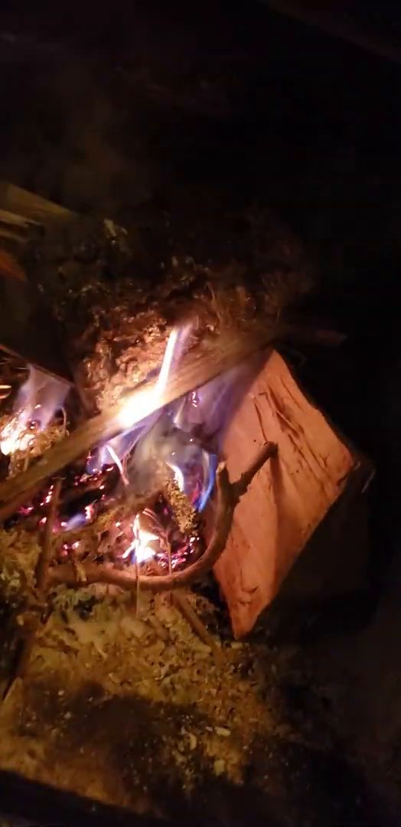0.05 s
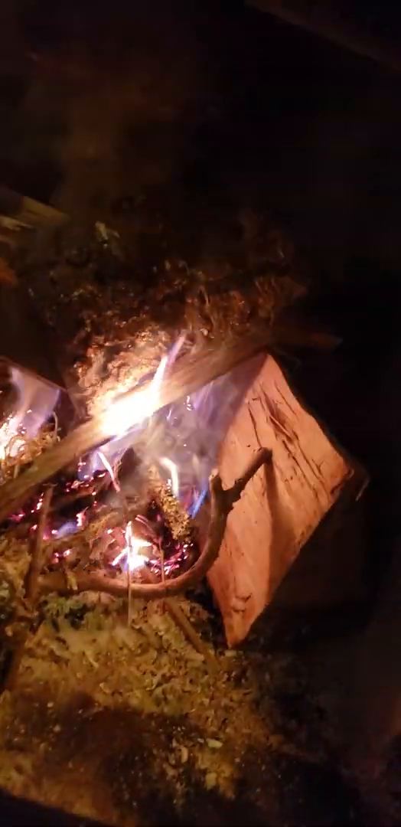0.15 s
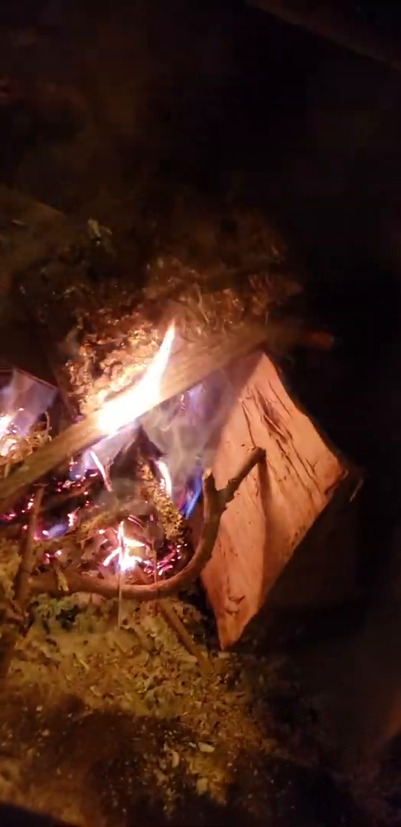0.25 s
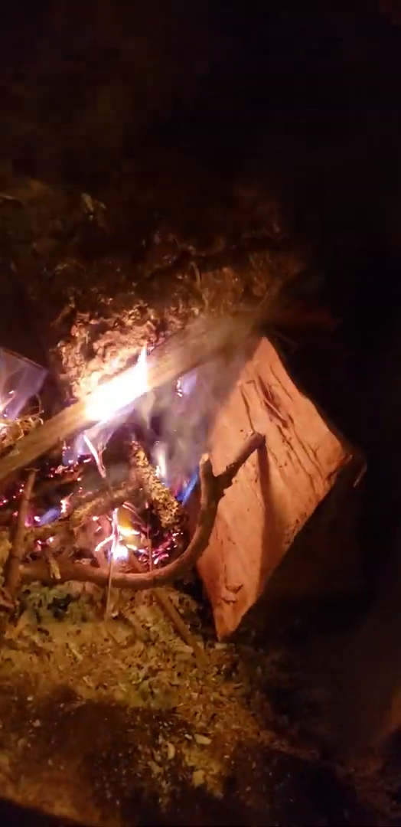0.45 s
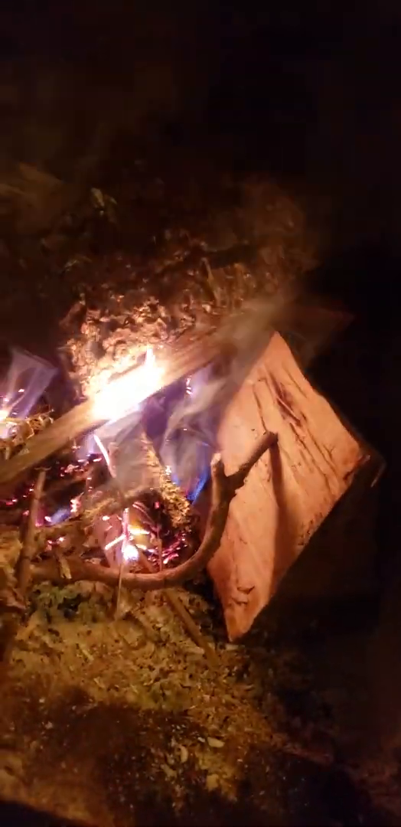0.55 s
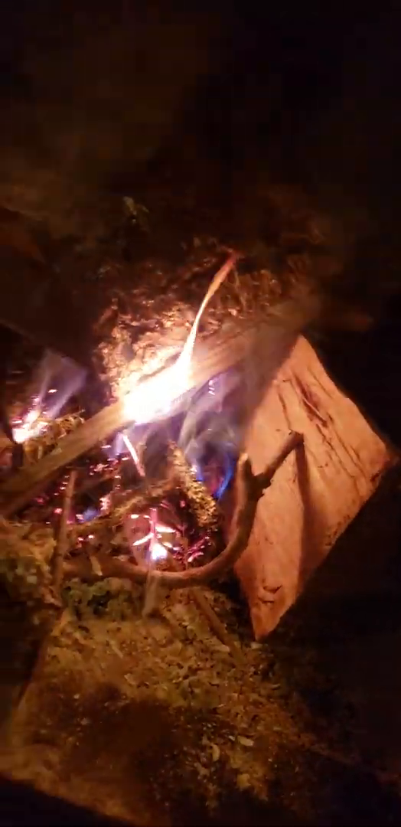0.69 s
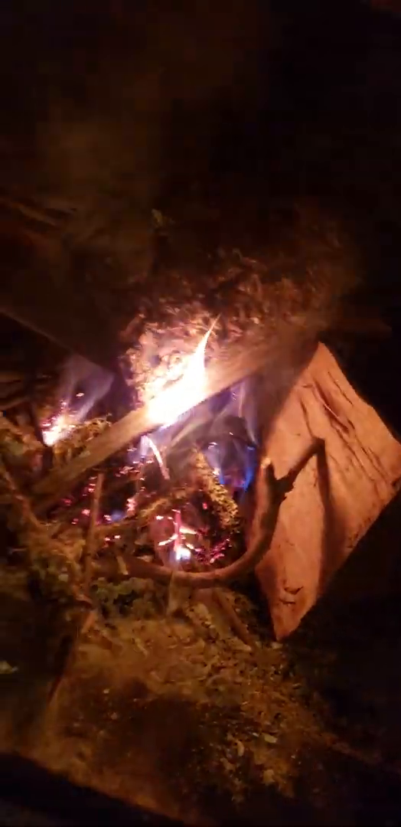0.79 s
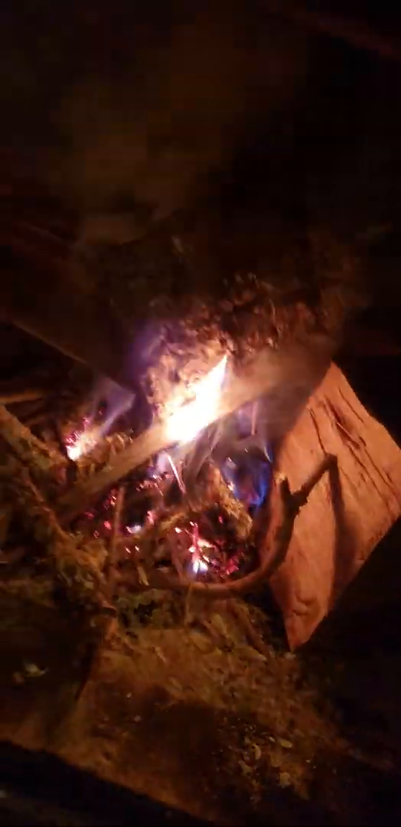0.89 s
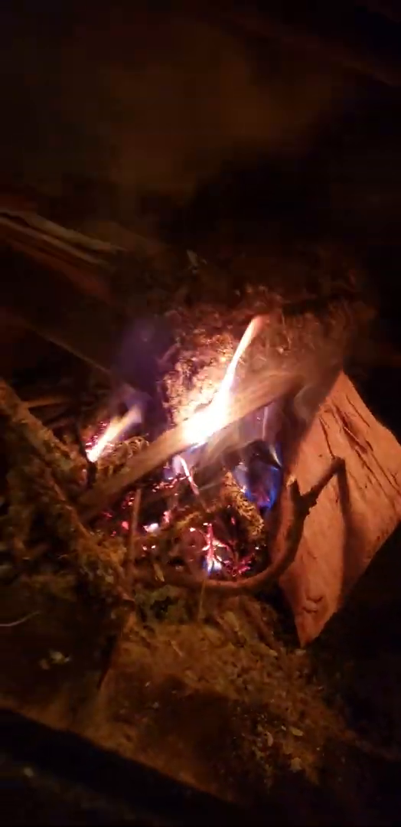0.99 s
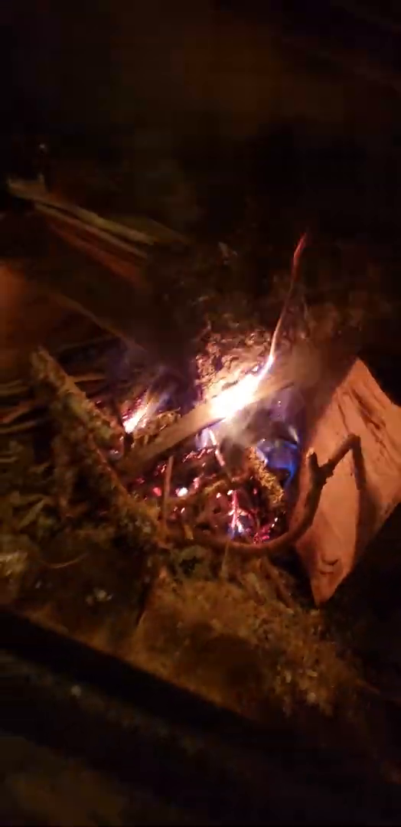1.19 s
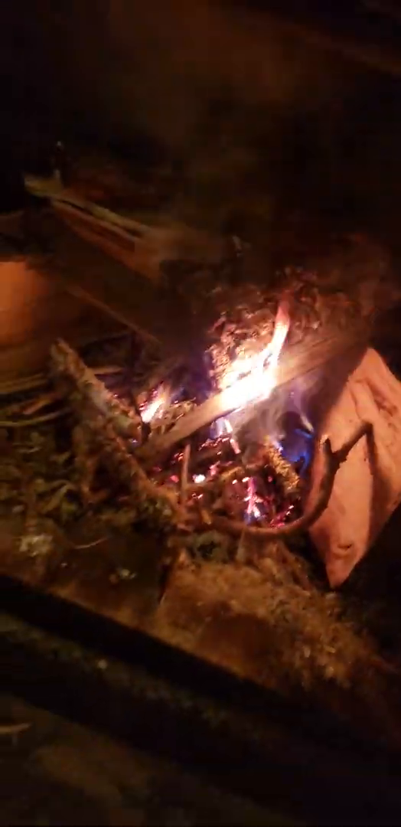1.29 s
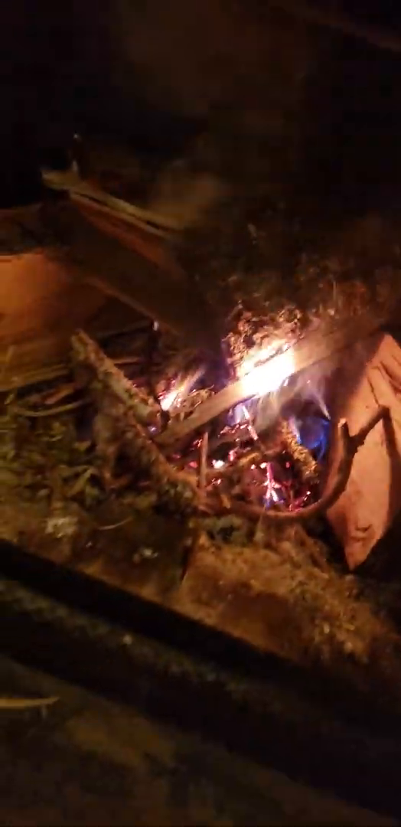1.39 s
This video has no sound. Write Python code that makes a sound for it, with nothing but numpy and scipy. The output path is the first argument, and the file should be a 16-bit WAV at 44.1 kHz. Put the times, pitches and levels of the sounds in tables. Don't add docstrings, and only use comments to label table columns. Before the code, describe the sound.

Small wood fire crackling close up, with sharp irregular snaps, fine sizzle and soft hollow knocks

```python
import sys
import numpy as np
from scipy import signal
from scipy.fft import rfft, irfft
from scipy.io import wavfile
from scipy.ndimage import uniform_filter1d

SR = 44100
rng = np.random.default_rng(int(sys.argv[2]) if len(sys.argv) > 2 else 0)


def elevation(decibels):
    levels = np.asarray(decibels, float)
    return 10 ** (levels / 20)


def store_pcm(level_fs):
    pcm = np.round(np.clip(level_fs, -1, 1) * 32767).astype(np.int16)
    wavfile.write(sys.argv[1], SR, np.atleast_2d(pcm).T)


N = 63945

# (frequency [Hz], level [dB], decay time T60 [s])
BOX_MODES = [(66, -46, 0.48), (107.6, 3.5, 0.2), (150, -5.5, 0.18), (193.3, -0.5, 0.13), (250, -22, 0.13),
             (278, -15, 0.24), (322.1, 0, 0.13), (365.5, -0.5, 0.029), (456, -4, 0.036),
             (584.3, -7.5, 0.072), (699, -4, 0.031), (822, -13.5, 0.1), (1197, -5.5, 0.087)]
TICK_DEEP_DB = -3.5


def rms_one(x):
    return x / np.sqrt(np.mean(x ** 2) + 1e-20)


def at_hz(points, hz):
    point_hz, values = np.transpose(points)
    return np.interp(np.log(hz), np.log(point_hz), values)


def drift(rate_hz):
    hop, settle = 40, 2000
    pole = np.exp(-2 * np.pi * rate_hz * hop / SR)
    white = rng.standard_normal(N // hop + settle + 2)
    slow = signal.lfilter([1], [1, -2 * pole, pole ** 2], white)[settle:]
    return np.interp(np.arange(N) / hop, np.arange(len(slow)), rms_one(slow))


def ring(x, hz, t60):
    decay = elevation(-60 / (t60 * SR))
    angle = 2 * np.pi * hz / SR
    return signal.lfilter([0, np.sin(angle)], [1, -2 * decay * np.cos(angle), decay ** 2], x + 1e-18)


def colour(x, peaks):
    out = 0
    for k, (hz, width_hz, db) in enumerate(peaks):
        t60 = np.log(1000) / np.pi / width_hz
        out = out + (-1) ** k * elevation(db) * ring(x, hz, t60)
    return out


def dip(x, dips):
    for hz, width_hz, depth in dips:
        band = signal.lfilter(*signal.iirpeak(hz, hz / width_hz, fs=SR), x)
        x = x - np.clip(depth, 0, 1) * band
    return x


def lag(x, delay_s):
    cycles = delay_s * SR * np.arange(N // 2 + 1) / N
    return irfft(rfft(x) * np.exp(-2j * np.pi * cycles), N)


def banded_noise(spectrum, patchy_db, likeness_scale):
    # (frequency [Hz], correlation [0-1])
    port_likeness = [(60, 1), (250, 0.74), (600, 0.46), (2000, 0.42), (15000, 0.73)]
    out, together = 0, drift(1.9)
    lowest, highest = spectrum[0][0], spectrum[-1][0]
    octaves = np.log2(min(highest, 19000) / lowest)
    edges = np.append(lowest * 2 ** np.arange(0, octaves, 1 / 3), highest)
    white = rng.standard_normal((2, 2, N + 8000))
    for k, band in enumerate(zip(edges, edges[1:])):
        sos = signal.butter(2, band, "band", fs=SR, output="sos")
        mid, side = signal.sosfilt(sos, white[k % 2])[:, -N:]
        hz = np.sqrt(band[0] * band[1])
        alike = np.clip(likeness_scale * at_hz(port_likeness, hz), -.99, .99)
        gain = elevation(at_hz(spectrum, hz) + patchy_db * (0.2 * together + drift(10.1)))
        out = out + gain * (np.sqrt(1 + alike) * mid + np.sqrt(1 - alike) * side * [[1], [-1]])
    return rms_one(out)


def snaps():
    # (time [s], peak [dB], deep re bright [dB], body re bright [dB], tear length [ms])
    loud_snaps = [(.0284, -28, -11.5, -5.5, 1.75), (.0917, -32, -3.5, 1, .7), (.1549, -23, -14, -11.5, .25),
                  (.2967, -35, 2, -2, 1.38), (.3093, -39, -16, -2.5, 0.56), (.3776, -19, -15.5, -12, 0.46),
                  (.4971, -33.5, -32, -9.5, 0.87), (.5137, -32.5, -15, -8.5, 3.6),
                  (.7436, -23, -26, -10, 6), (.8348, -26, -3.5, -0.5, 1.1), (.9362, -11.5, -8, 1.5, 3.2),
                  (1.035, -30, -46, -10, 1.6), (1.1426, -39.5, -19, -4, 0.95), (1.207, -41, -11.5, -1, 1.3),
                  (1.2667, -31.5, -37, -1.5, 2.75), (1.439, -25, -27, -7.5, 1.2)]
    snap_sides = [2, -3.5, 10.5, 3.5, -11, 8, 2, -4, 2, 0.5, 2, 0, -14, -1.5, -9.5, 1]
    # (time [s], peak [dB], body re bright [dB])
    early_ticks = [(0.0002, -34, -1.5), (0.0588, -37.5, -1.5), (0.0664, -54, -16), (0.1012, -46, 4),
                   (0.1449, -38, -22), (0.1975, -36, -6.5), (0.2005, -47, -10), (0.2174, -38.5, -7),
                   (0.2363, -36, -19), (0.2428, -39, -28), (0.2513, -45, -24), (0.2838, -67, -13),
                   (0.2888, -48, -11), (0.3258, -38, 1), (0.3391, -48, 3), (0.391, -50.5, 10.5),
                   (0.41, -34, -9), (0.4283, -40, -2.5), (0.4328, -37, -9), (0.4823, -39, -26),
                   (0.507, -37, -21), (0.5395, -39, -9), (0.547, -42, 6)]
    # (time [s], peak [dB], body re bright [dB])
    late_ticks = [(0.5612, -33.5, -9), (0.574, -54, 8), (0.7991, -51, -7), (0.9576, -41, 1.5),
                  (0.9712, -35, -12), (1.0469, -45, -5), (1.0567, -36.5, -7.5), (1.1767, -45, -6.5),
                  (1.1885, -36.5, -34), (1.2291, -41, -21), (1.2491, -50, -8), (1.3094, -49, -28)]
    tick_ms, first_crack_db = 2, 3.5
    crack_spread_db, part_spread_db = 7, 3
    swell = 0.083
    deep_fade_db = 11

    rows = list(loud_snaps)
    for s, db, body_db in list(early_ticks) + list(late_ticks):
        rows.append((s, db, body_db + TICK_DEEP_DB, body_db, tick_ms))
    sides = np.append(snap_sides, np.zeros(len(rows) - len(loud_snaps)))
    chance = rng.uniform(-1, 1, (len(rows), 6, 12))
    trains = np.zeros((3, 2, N + SR))
    for (s, db, deep_db, body_db, ms), side_db, draws in zip(rows, sides, chance):
        signs, sizes, when, *mix = draws
        part = np.sort(np.abs(when)) - np.abs(when).min()
        at = ((s + 0.00053 + ms / 1000 * part) * SR).astype(int)
        crack_db = db - 10.5 - 6.35 * part + crack_spread_db * sizes + first_crack_db * (part == 0)
        cracks = elevation(crack_db) * np.sign(signs) * np.clip(0.39 + part / swell, 0, 1)
        part_db = np.array([[0], [body_db], [deep_db]]) - deep_fade_db * part * [[0], [.3], [1]]
        cracks = cracks * elevation(part_db + part_spread_db * np.array(mix))
        panned = cracks[:, None] * elevation([[side_db / 2], [-side_db / 2]])
        np.add.at(trains, (slice(None), slice(None), at), panned)
    return trains[..., :N]


def sizzle():
    rate_per_s, base_db, spread_db, body_db = 300, -74, 4.5, 1.5
    born = rng.random(N) < rate_per_s * elevation(3 * drift(8)) / SR
    size_db = base_db + spread_db * np.minimum(rng.exponential(1, N), 3)
    cracks = elevation(size_db) * rng.choice([-1, 1], N) * born
    return cracks * elevation([[[0]], [[body_db]], [[body_db + TICK_DEEP_DB]]])


def ports(bright, body, deep):
    # (frequency [Hz], width [Hz], level [dB])
    left_bright = [(14940, 1300, 2), (12600, 3600, 0.5)]
    right_bright = [(13150, 2500, 6.5), (16000, 2100, 6), (10650, 2000, -6)]
    left_body = [(7420, 910, 4.5), (5350, 4100, 5.5), (3810, 740, -4)]
    right_body = [(7400, 3700, -26), (4976, 630, 0)]
    left_deep = [(2270, 4200, -3), (1170, 2800, -5)]
    right_deep = [(2260, 780, 1.5), (1420, 2300, -12.5)]
    # (frequency [Hz], width [Hz], depth [0-1])
    right_shadow = [(3630, 1000, 0.04), (10100, 1700, 0.5), (6020, 660, 0.77)]
    bright_lag_s, right_lag_s = 0.0001136, .0001
    pan_db = 1

    left = colour(bright[0], left_bright) + colour(body[0], left_body) + colour(deep[0], left_deep)
    right = lag(colour(bright[1], right_bright), bright_lag_s)
    right = right + lag(colour(body[1], right_body) + colour(deep[1], right_deep), right_lag_s)
    heard = np.array([left, dip(right, right_shadow)])

    t = np.arange(SR // 4) / SR
    walls = elevation(-7 - 60 * t / 0.014)
    room = elevation(-37 - 60 * t / .14)
    tail = (walls + room) * rng.standard_normal((2, len(t))) * (t > .0008) / 4
    tail[:, 0] = 1
    return signal.fftconvolve(heard, tail, axes=1)[:, :N] * elevation([[pan_db / 2], [-pan_db / 2]])


def box(pushes):
    modes = []
    for k, ((hz, db, t60), push) in enumerate(zip(BOX_MODES, pushes)):
        modes.append(elevation(db) * ring(push, hz, t60) * (-1) ** k)
    mid = sum(modes)
    side = elevation(-44) * (sum(modes[::2]) - sum(modes[1::2]))
    return np.array([mid + side, mid - side])


def draught():
    # (time [s], level [dB])
    draw = [
        (0, -54),
        (.5, -57.5),
        (.8, -48.5),
        (1.0, -54.5),
        (1.2, -57),
        (1.45, -59.5),
    ]
    # (frequency [Hz], density [dB per Hz])
    rumble_spectrum = [(12, -79), (20, -18), (101, -0.5), (130, -22), (258, -14), (304, -16.5),
                       (380, -25.5), (700, -32), (910, -36.5), (1540, -120)]
    hum_db, rumble_db = -2.5, -2.5
    blow = signal.lfilter([1], [1, -1.9, .9025], rng.standard_normal(N)) * elevation(2.2 * drift(8.3))
    hum = elevation(hum_db) * rms_one(box([blow] * len(BOX_MODES)))
    rumble = elevation(rumble_db) * banded_noise(rumble_spectrum, patchy_db=2.16, likeness_scale=0.98)
    s, db = np.transpose(draw)
    return elevation(np.interp(np.arange(N) / SR, s, db)) * (hum + rumble)


def gas_hiss():
    # (time [s], level [dB])
    outgassing = [
        (0, -60),
        (0.199, -59),
        (.46, -63.5),
        (.72, -57),
        (1.15, -60.5),
        (1.45, -65),
    ]
    # (frequency [Hz], density [dB per Hz])
    hiss_spectrum = [(400, -4), (1000, -9), (1600, -13.5), (4500, -7.5), (7300, -2.5), (10000, -6),
                     (14500, 2), (17500, -37)]
    s, db = np.transpose(outgassing)
    level = elevation(np.interp(np.arange(N) / SR, s, db))
    return level * banded_noise(hiss_spectrum, patchy_db=2.5, likeness_scale=0.23)


def vents():
    # (start [s], length [s], level [dB], centre [Hz], width [octaves])
    puffs = [(0.145, 0.081, -59, 7500, 0.11), (0.532, 0.069, -56, 12000, 3.3),
             (.548, 0.043, -52.5, 760, 2.2), (.641, 0.024, -48, 840, 4.6), (.640, 0.03, -47, 9000, 2.3),
             (0.6, 0.04, -54.5, 740, 0.67), (0.59, 0.18, -63, 900, 4.9), (0.949, 0.055, -63, 3440, 1.4),
             (1.082, 0.04, -54, 12700, 1.65), (1.09, 0.036, -67.5, 2780, 0.62),
             (.521, 0.09, -58.5, 800, 0.82), (.728, 0.011, -59, 780, 0.95), (.66, 0.016, -55, 1220, 0.39)]
    out, t = np.zeros((2, N)), np.arange(N) / SR
    for s, length, db, hz, octaves in puffs:
        half = 2 ** (octaves / 2)
        edges = np.clip([hz / half, hz * half], 50, 17000)
        sos = signal.butter(2, edges, "band", fs=SR, output="sos")
        noise = signal.sosfilt(sos, rng.standard_normal((2, N)))
        rise = np.clip((t - s) / .0025, 0, 1)
        fade = elevation(-60 * np.clip((t - s) / length - .6, 0, 9) ** 2)
        out += elevation(db + 1.8 * drift(130)) * rise * fade * rms_one(noise)
    return out


def knocks():
    # (time [s], level [dB], panel pitch [Hz])
    contacts = [(0.148, -32.5, 216), (0.156, -46, 337), (0.187, -50, 223), (.545, -25, 367),
                (0.5478, -19.5, 204), (0.5525, -25, 198), (.5575, -25.5, 347), (0.5593, -23, 150),
                (0.583, -30, 230), (0.6, -29.5, 109), (.622, -30, 183), (.643, -31.5, 620),
                (0.651, -26, 584), (0.669, -28, 108), (0.6877, -30.5, 117), (.735, -32.5, 99),
                (0.778, -40.5, 190), (0.824, -42, 107), (0.995, -45, 101), (.795, -46.5, 312),
                (0.836, -49.5, 257), (0.928, -46.5, 197), (1.255, -48, 150)]
    s, db, panel_hz = np.transpose(contacts)
    octaves_off = np.log2(np.array(BOX_MODES)[:, :1] / panel_hz)
    pushes = np.zeros((len(BOX_MODES), N))
    pushes[:, (s * SR).astype(int)] = elevation(db - 6 - 7.5 * octaves_off ** 2)
    soft = signal.butter(2, 875, fs=SR, output="sos")
    return box(signal.sosfilt(soft, pushes + 1e-18))


def scene():
    low_pan_db, low_cut_hz, port_lag_s = 2, 45, .00003
    cracks = snaps() + sizzle()
    low = (knocks() + draught()) * elevation([[low_pan_db / 2], [-low_pan_db / 2]])
    low = signal.sosfilt(signal.butter(2, low_cut_hz, "high", fs=SR, output="sos"), low)
    left, right = ports(*cracks) + gas_hiss() + vents() + low
    return np.array([left, np.roll(right, int(port_lag_s * SR))])


def top_cut(x):
    return signal.sosfilt(signal.butter(12, 17160, fs=SR, output="sos"), x)


def record(dry):
    # (frequency [Hz], width [Hz], depth [0-1])
    mic_dips = [(3270, 880, 0.47), (9490, 1700, 0.32)]
    hiss_top_hz, gate_db = 15550, -62
    dry = signal.sosfilt(signal.cheby2(10, 60, 17700, fs=SR, output="sos"), dip(dry, mic_dips))
    top = signal.sosfiltfilt(signal.cheby2(12, 30, hiss_top_hz, "high", fs=SR, output="sos"), dry)
    shut = uniform_filter1d(np.abs(top).mean(0), size=256) < elevation(gate_db)
    mix = dry - top * uniform_filter1d(shut * 1., size=128)
    return top_cut(mix)


dry = scene()
out = record(dry)
store_pcm(out)
```